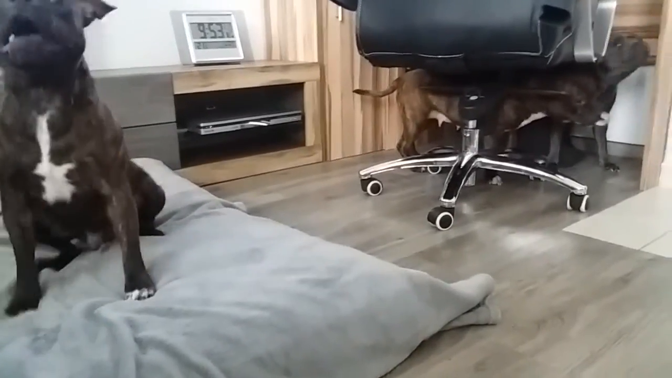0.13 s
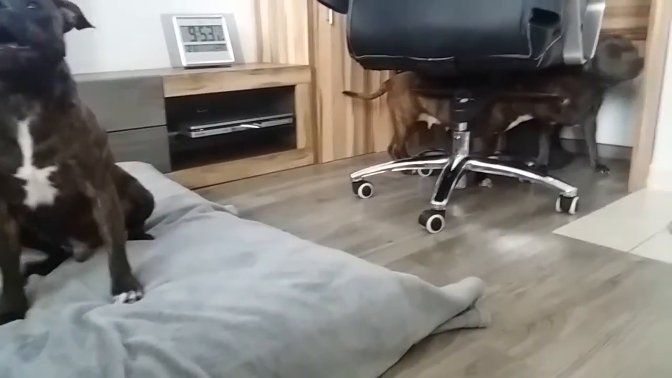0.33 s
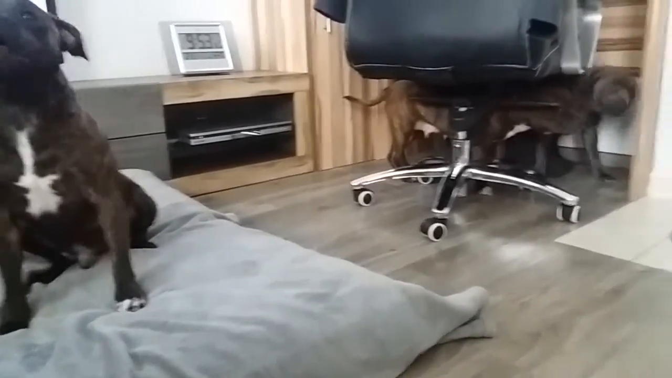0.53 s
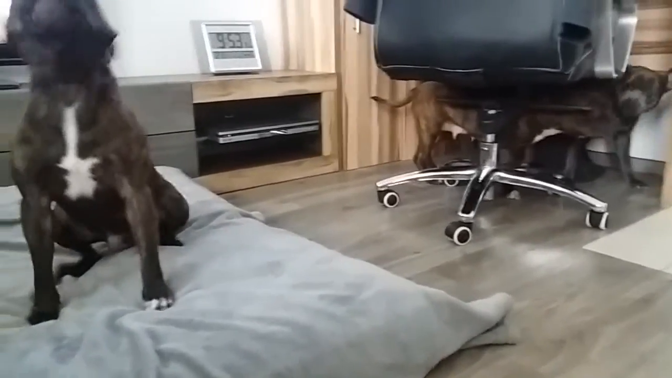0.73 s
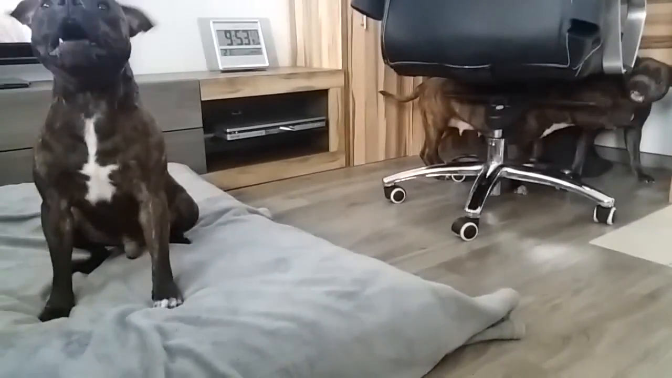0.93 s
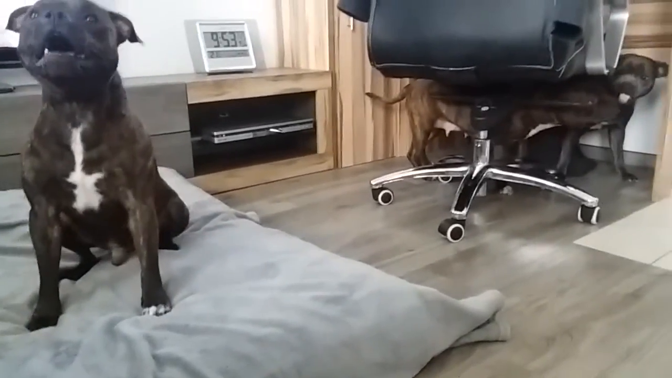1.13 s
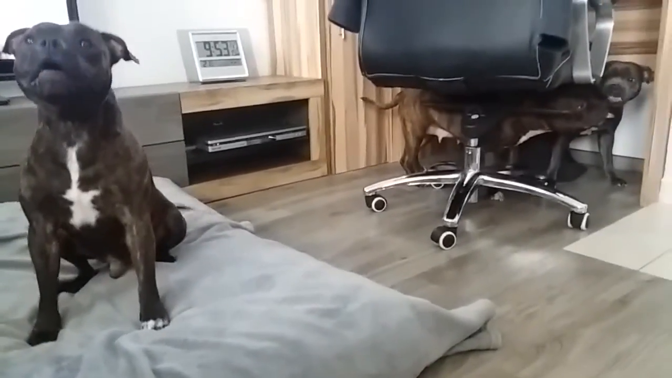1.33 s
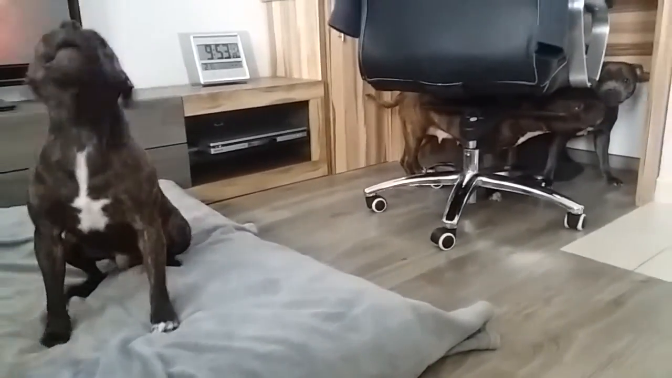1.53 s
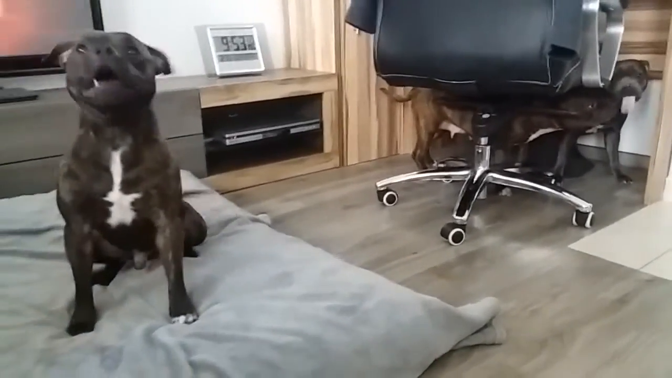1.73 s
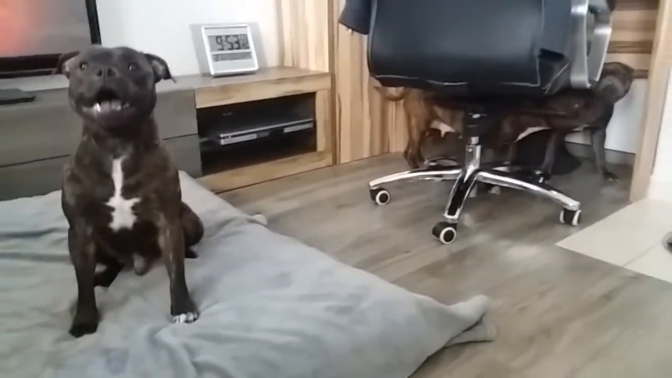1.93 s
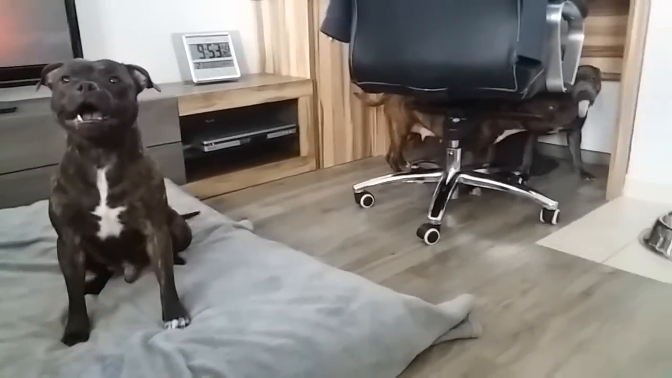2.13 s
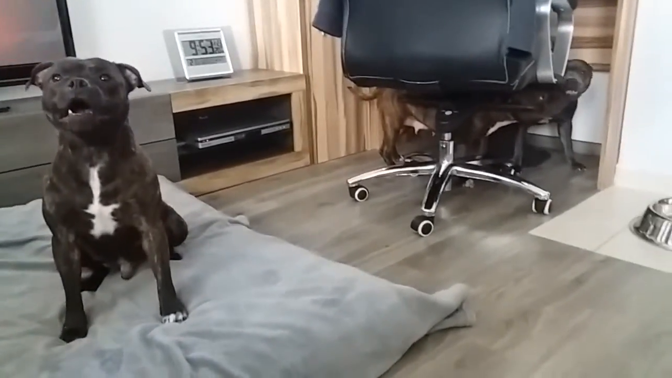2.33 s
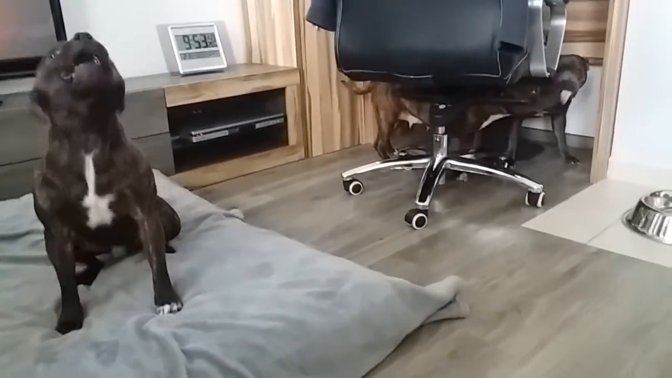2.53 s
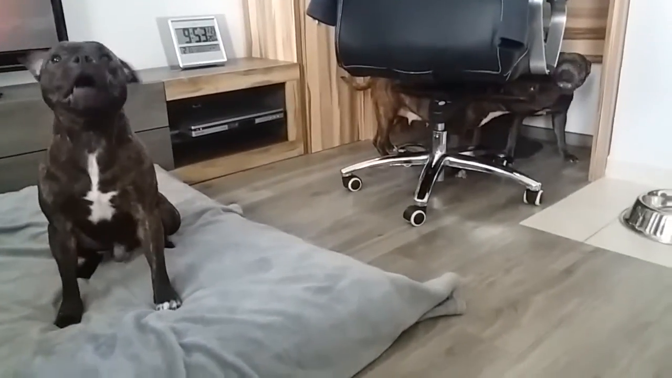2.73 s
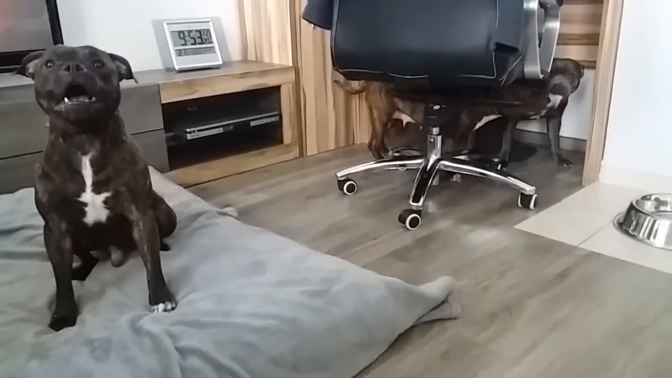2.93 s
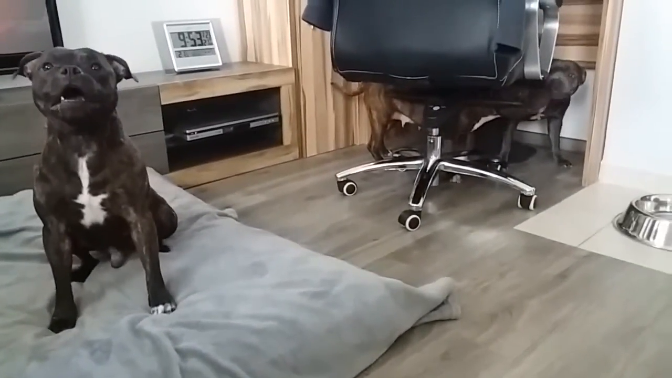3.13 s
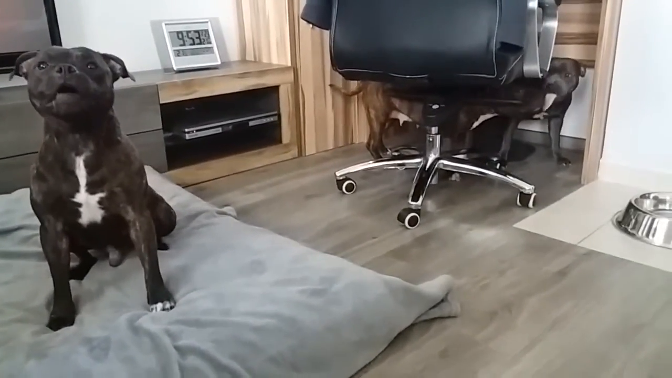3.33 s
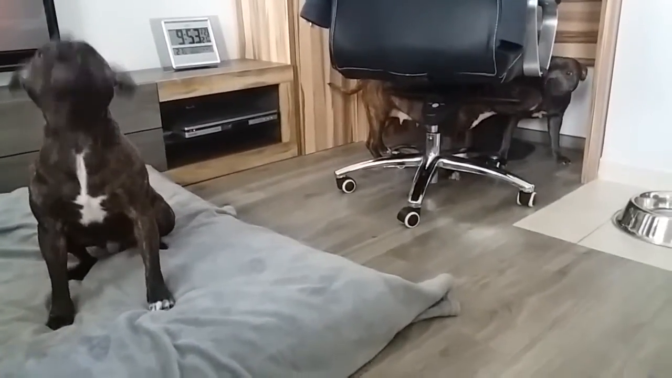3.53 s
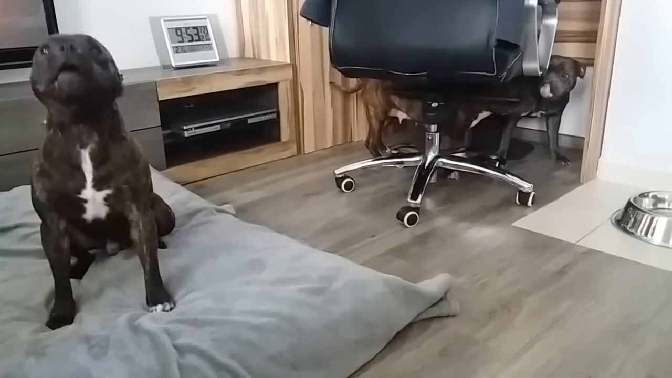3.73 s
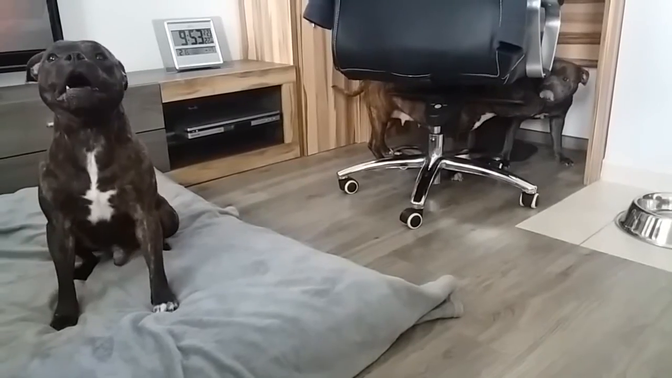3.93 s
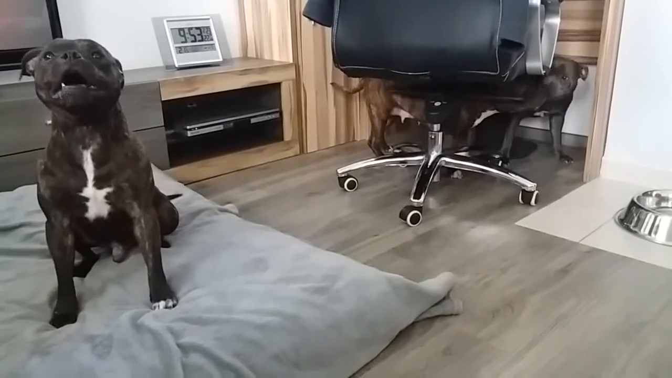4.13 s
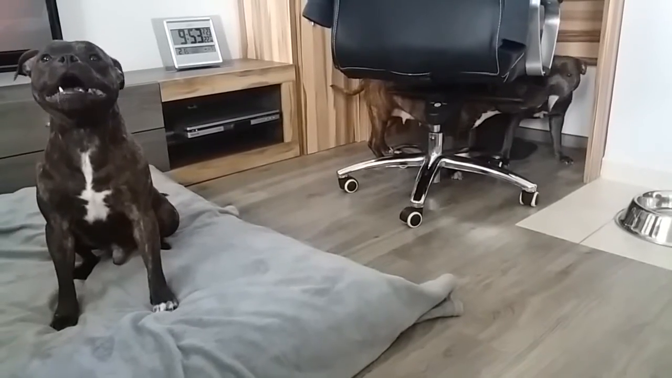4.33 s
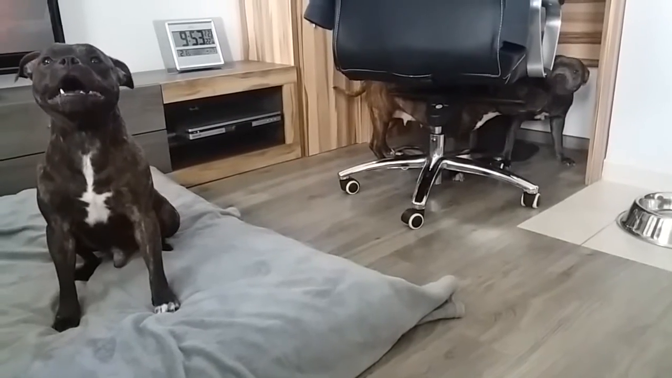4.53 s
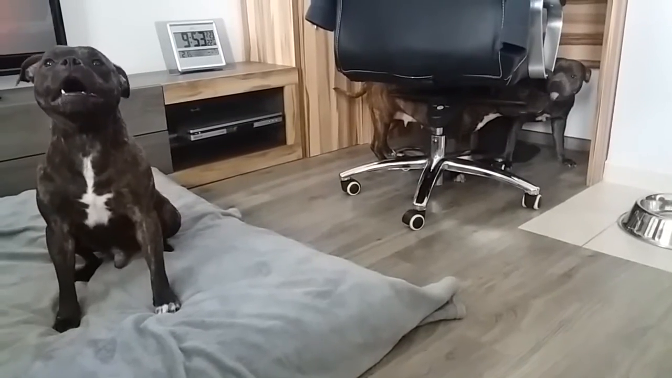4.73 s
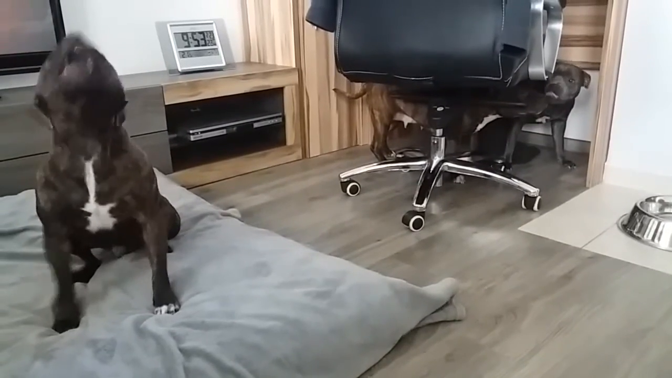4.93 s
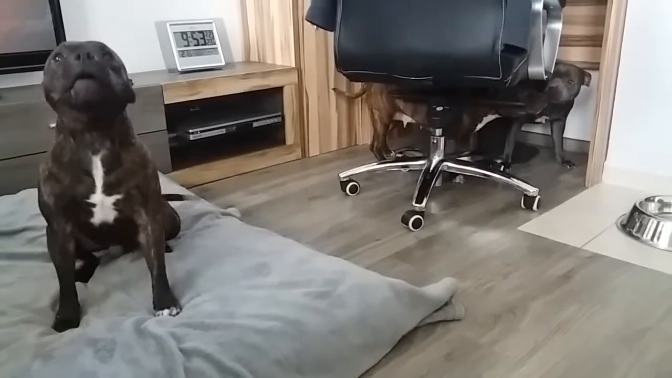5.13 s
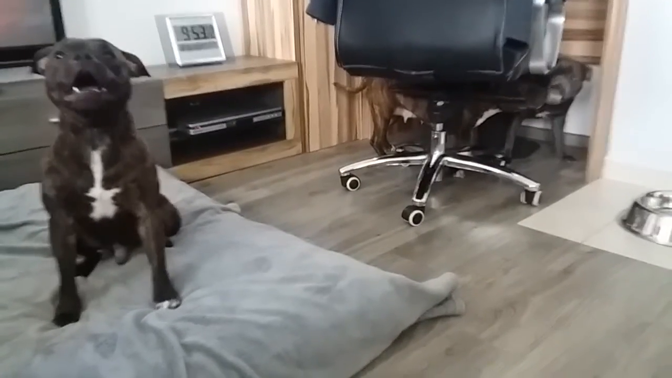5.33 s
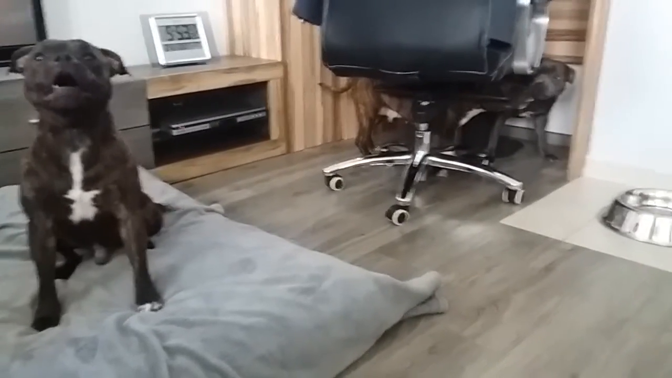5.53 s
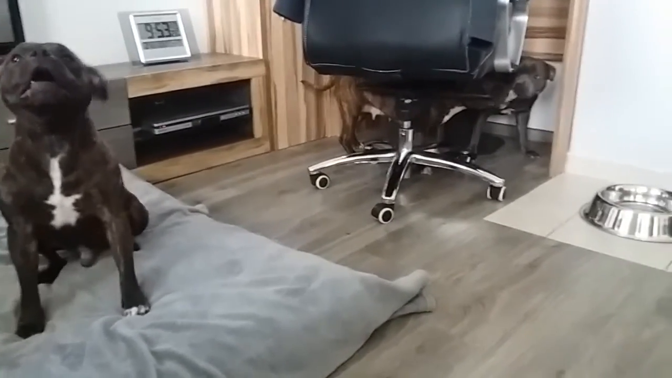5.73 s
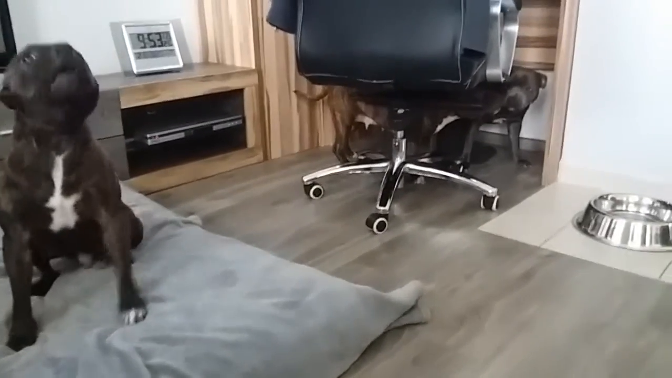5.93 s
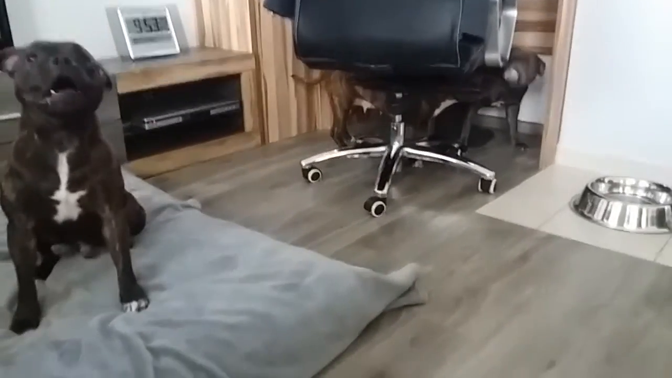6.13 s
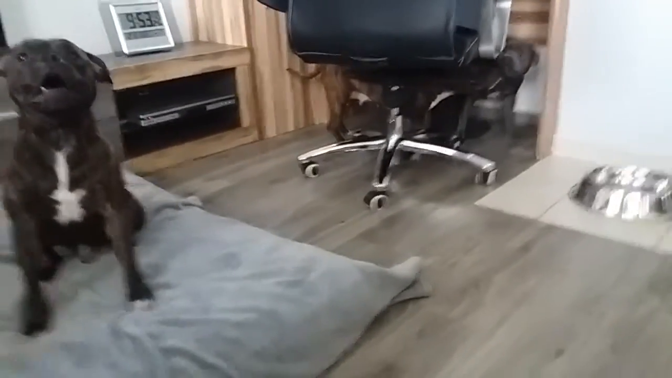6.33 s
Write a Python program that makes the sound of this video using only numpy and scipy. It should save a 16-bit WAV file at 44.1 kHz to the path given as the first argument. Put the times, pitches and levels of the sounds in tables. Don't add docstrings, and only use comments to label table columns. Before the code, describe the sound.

Indoors, over a soft household hum, a dog is already barking as the sound opens. Five gruff, separate barks, a longer gap with quiet breaths, a sharp claw knock between the last two barks, the final one loudest, then a short airy snort through the nose. The room rings after each bark; phone microphone at close to medium distance, with slight handling bumps and rustle of bedding.

```python
import sys
import numpy as np
from scipy import signal
from scipy.io import wavfile
from scipy.ndimage import uniform_filter1d

SR = 44100
rng = np.random.default_rng(int(sys.argv[2]) if len(sys.argv) > 2 else 0)


def voltage_ratio(level):
    return 10 ** (np.asarray(level, float) / 20)


def wav_out(sig):
    wavfile.write(sys.argv[1], SR, np.round(np.clip(np.atleast_2d(sig).T, -1, 1) * 32767).astype(np.int16))


N = 281308
LEAD = SR // 4

# f/Hz, width/Hz, level/dB
THROAT = [(618, 204, 13), (786, 370, -3), (503, 40, -27.5)]
# f/Hz, width/Hz, level/dB
MOUTH = [(1082, 233, 5), (1313, 342, -3), (1483, 336, -2), (1904, 336, -15)]
# f/Hz, width/Hz, level/dB
RASP = [(4690, 456, 9.5), (4380, 370, -2.5), (5200, 340, -15)]
# f/Hz, width/Hz, level/dB
NOSE = [(6220, 900, -1.5), (7650, 700, -2.5), (8600, 1000, -7.5), (11300, 1900, -24.5),
        (13500, 2500, -30.5), (3200, 620, 1.5), (2415, 320, 3)]


def bark(timing, voice_settings, rasp_settings):
    start, rise, hold, peak_db, first_db = timing
    top_hz, mouth_db, nose_db, closing_db, fall_db = voice_settings
    rasp_db, rush_db, fade_db, first_hz, settled_hz = rasp_settings
    t = np.arange(0, .3, 1 / SR)

    sag_db, voiced_fall_s = -3.5, 0.083
    held = t - rise
    falling = held - hold
    under_db = first_db * (1 - t / rise).clip(0) + sag_db * (held / hold).clip(0, 1)
    under_db = under_db + fall_db * falling.clip(0, voiced_fall_s)
    slack = (-under_db / 11.0).clip(0, 1)

    throat_hz = top_hz * (1 - .12 * slack * np.where(t < rise, 1, .4))
    opening = throat_hz / THROAT[0][0]
    shut_db = -13.5 * np.exp(-t / 0.0077)
    mouth_db = mouth_db + 6.0 * slack + shut_db
    nose_db = nose_db + np.where(t < rise, 10.5, closing_db) * slack

    rush_s, glide_s, settle_s, overshoot_hz = 0.027, .033, 0.07, 250
    rush = (t / rush_s) * np.exp(1 - t / rush_s)
    rasp_db = rasp_db + rush_db * rush + fade_db * t + shut_db
    glide_hz = settled_hz + overshoot_hz * (first_hz < settled_hz)
    rasp_hz = np.interp(t, [0, glide_s, settle_s], [first_hz, glide_hz, settled_hz])

    wobble, strength, air = rng.standard_normal((3, SR // 3))[:, :len(t)]
    slaps_per_s = 103 * (1 + .25 * evened(uniform_filter1d(wobble, 400))).clip(.3, 3)
    turns = np.cumsum(slaps_per_s) / SR
    slaps = np.diff(np.floor(turns), prepend=0) * voltage_ratio(1.5 * strength)
    puffs = np.exp(-(turns % 1) / 0.38)
    rough = .35 + (.7 - .35) * slack
    drive = (1 - rough) * evened(slaps) + rough * evened((0.09 + puffs) * air)

    voice = tract(drive, THROAT, opening, wander=0.027)
    voice = voice + voltage_ratio(mouth_db) * tract(drive, MOUTH, opening ** 0.83, flicker_db=3.5, wander=0.042)

    stream = (.6 + puffs) * air
    teeth = tract(stream, RASP, rasp_hz / RASP[0][0], flicker_db=3.0, wander=.012)
    nose_slide = .96 - .1 * np.exp(-t / .025)
    nose = tract(stream, NOSE, nose_slide, flicker_db=5.5, wander=0.031)
    sparkle = tract(stream, NOSE[3:5], opening ** .5, flicker_db=5.0, wander=.03)
    sparkle_db = nose_db + 6.5 * (1 - slack) - 26
    rasp = voltage_ratio(rasp_db) * teeth + voltage_ratio(nose_db) * nose + voltage_ratio(sparkle_db) * sparkle

    edges = t.clip(0, .006) / 0.0045 * np.exp(-(falling - voiced_fall_s).clip(0) / 0.035)
    return start, voltage_ratio(peak_db + under_db) * (voice + rasp) * edges


def grunt(s, db, hz):
    t = np.arange(6000) / SR
    cycles = np.sin(2 * np.pi * hz * t)
    cycles += 0.44 * np.sin(4 * np.pi * hz * t) + 0.25 * np.sin(6 * np.pi * hz * t)
    cycles *= (t / 0.019) * np.exp(1 - t / 0.0089)
    chest_hz, chest_width_hz, chest_db, chest_s = 358, 200, -9.0, .025
    chest = voltage_ratio(chest_db) * evened(resonate(rng.standard_normal(len(t)), chest_hz, chest_width_hz))
    chest *= (t / chest_s) * np.exp(1 - t / chest_s)
    return s, voltage_ratio(db) * (cycles + chest)


def gulp(s, length, db, bright_db):
    air = rng.standard_normal(SR // 4)[:round(length * SR)]
    low = tract(air, THROAT + MOUTH, 1.31)
    high = tract(air, RASP + NOSE[:1] + NOSE[-2:], .94, flicker_db=2.0)
    return s, voltage_ratio(db) * np.hanning(len(air)) * soften(low + voltage_ratio(bright_db) * high, 7500)


def snort():
    # f/Hz, level/dB per Hz
    blast_colour = [(30, -15), (120, 6.5), (220, -10.5), (400, -8.5), (700, -4), (1500, -18), (3000, -5.5),
                    (6000, -11.5), (9000, -18), (12000, -44.5)]
    # f/Hz, level/dB per Hz
    fizz_colour = [(5000, -37), (8000, 2.5), (11000, 0), (14000, -7), (15700, -3)]
    # f/Hz, width/Hz, level/dB
    nostrils = [(2900, 100, -9.5), (3130, 100, -11), (2199, 42, -16), (1470, 42, -16), (4450, 60, -19.5),
                (3750, 95, -28), (3260, 68, -17), (300, 280, -9.5)]
    # f/Hz, width/Hz, level/dB
    first_nostrils = [(4280, 300, -38), (5700, 350, -35), (2200, 280, -36)]
    snort_s, snort_db, attack_s, hold_s = 6.135, -31, .009, .05
    t = np.arange(N - round(snort_s * SR)) / SR
    after = (t - attack_s - hold_s).clip(0)
    blast_db = snort_db - 2.5 * (1 - t / hold_s).clip(0) - 240 * after
    blast = (t / attack_s).clip(0, 1) * voltage_ratio(blast_db)
    air = hiss(blast_colour, len(t), patchy_db=1.5)
    fizz = voltage_ratio(-13 - 100 * after) * hiss(fizz_colour, len(t), patchy_db=1.5)

    nose = np.zeros(len(t))
    for hz, width, db in nostrils:
        nose += voltage_ratio(db) * evened(resonate(air, hz * (1 + .012 * np.sin(hz + 40 * t)), width))
    nose *= (t > .022) * voltage_ratio(15 * t / 0.14)

    start = sum(voltage_ratio(db) * evened(resonate(air, hz, width)) for hz, width, db in first_nostrils)
    start = start * np.exp(-((t - .012) / 0.0067) ** 2)
    flutter = voltage_ratio(2.2 * evened(uniform_filter1d(rng.standard_normal(len(t)), 150)))
    return snort_s, blast * (air + nose + fizz) * flutter + start


def claw(s, tick_db, tick_hz, knock_db):
    edge = np.zeros(3000)
    edge[4:7] = voltage_ratio(tick_db - 18.5) * np.array([1, -2, 1])
    return s, edge + struck(knock_db - 13.0, 1000, 900) + struck(tick_db + 10.0, tick_hz, 1300)


def paw(s, thud_db, thud_hz):
    return s, struck(thud_db + 5.0, thud_hz, 130)


def struck(db, hz, width):
    blow = np.zeros(3000)
    blow[:9] = np.hanning(9)
    ring = resonate(blow, hz, width)
    return voltage_ratio(db) * ring / abs(ring).max()


def tag(t):
    # f/Hz, level/dB
    slow_modes = [(2180, -67), (2740, -68), (2850, -72.5), (3120, -69.5), (3400, -65), (3280, -68.5),
                  (3612, -66.5), (4560, -70), (745, -62.5)]
    # f/Hz, level/dB
    early_modes = [(264, -62), (6024, -69.5), (8586, -75), (10277, -84)]
    low = sum(voltage_ratio(db) * evened(resonate(rng.standard_normal(N), hz, 8.1)) for hz, db in slow_modes)
    high = sum(voltage_ratio(db) * np.sin(2 * np.pi * (hz * t + rng.random())) for hz, db in early_modes)
    return low * voltage_ratio(2.5 - 4 * t ** 2) + high * ((.72 - t) / 0.13).clip(0, 1)


def household(t):
    # f/Hz, level/dB per Hz
    hum_colour = [(60, -30.5), (130, -16.5), (250, -5), (400, -17.5), (600, -2), (750, -7), (900, -4),
                  (1200, -10.5), (2000, -16.5), (3400, -19.5), (4500, -19), (6000, -41.5), (9000, -50),
                  (15700, -56)]
    # f/Hz, width/Hz, level/dB
    drone_tone = (100, 25, -70)
    # peak t/s, level/dB, swell/dB per s, fade/dB per s
    shuffles = [
        (0, -41.5, 100, 48),
        (.22, -42, 301, 89),
        (.5, -52, 30, 10.5),
        (2.0, -64, 2.5, 3.5),
        (5.8, -54, 45, 5),
        (6.38, -48, 11, 30),
    ]
    # f/Hz, level/dB per Hz
    shuffle_colour = [(60, -37.5), (200, -1.5), (500, -1.5), (1200, -6.5), (3000, -7.5), (5000, -10.5),
                      (8000, -26), (15000, -53)]
    # peak t/s, level/dB, swell/dB per s, fade/dB per s
    hand_shifts = [
        (0, -50.5, 30, 6.5),
        (1.6, -44, 80, 110),
        (2.2, -63, 6, 12),
        (2.65, -48, 91, 141),
        (3.6, -50.5, 90, 49),
        (4.8, -63.5, 9, 8.0),
        (5.17, -39.5, 149, 146),
        (5.3, -54, 49, 11),
        (5.87, -44, 220, 105),
        (6.38, -47.5, 55, 30),
    ]
    # f/Hz, level/dB per Hz
    grip_colour = [(20, -33.5), (40, -27), (65, 0.5), (110, -7), (170, -6), (300, -25.5), (600, -63)]
    hum = voltage_ratio(-56.5) * hiss(hum_colour, N, patchy_db=2.0)
    drone_hz, drone_width_hz, drone_db = drone_tone
    drone = voltage_ratio(drone_db) * evened(resonate(rng.standard_normal(N), drone_hz, drone_width_hz))
    rustle = stirrings(t, shuffles) * hiss(shuffle_colour, N, patchy_db=1.5)
    grip = stirrings(t, hand_shifts) * hiss(grip_colour, N, patchy_db=3.0)
    return hum + drone + rustle + grip


def stirrings(t, rows):
    power = np.zeros(len(t))
    for s, db, swell_db, fade_db in rows:
        power += voltage_ratio(db - swell_db * (s - t).clip(0) - fade_db * (t - s).clip(0)) ** 2
    return np.sqrt(power)


def room(x):
    # f/Hz, t/s
    ring_times = [(120, 0.42), (330, 0.66), (870, 0.66), (2300, 0.84), (4800, 0.67), (7500, 0.51),
                  (12000, 0.42)]
    # t/s, level/dB
    echoes = [(.0031, -6), (.0074, -13.5), (.0113, -10.5), (.0168, -29.5), (.0225, -3.5)]
    taps = np.zeros(SR)
    at = np.arange(0, SR - 20, 20)
    taps[at + rng.integers(0, 20, len(at))] = rng.choice([-1., 1.], len(at))
    hz, t, z = signal.stft(taps, SR, nperseg=256)
    decay = voltage_ratio(-60 * t / read(ring_times, hz)[:, None])
    tail = signal.istft(z * decay, SR, nperseg=256)[1]
    tail *= (np.arange(len(tail)) / (0.0081 * SR)).clip(0, 1)
    tail /= np.linalg.norm(tail)
    for k, (s, db) in enumerate(echoes):
        tail[round(s * SR)] += (-1) ** k * voltage_ratio(db)
    return signal.fftconvolve(x, tail)[:len(x)]


def tract(x, modes, factor=0.941, flicker_db=0., wander=0.):
    slow = uniform_filter1d(rng.standard_normal((2, len(modes), SR // 3)), 900, axis=2)
    flicker, drift = evened(slow)[..., :len(x)]
    total = np.zeros(len(x))
    for k, (hz, width, db) in enumerate(modes):
        ring = resonate(x, hz * factor * (1 + wander * drift[k]), width)
        total += (-1) ** k * voltage_ratio(db + flicker_db * flicker[k]) * ring
    return evened(total)


def resonate(x, hz, width):
    r = np.exp(-np.pi * width / SR)
    if np.ndim(hz) == 0:
        pole = [1, -r * np.exp(2j * np.pi * hz / SR)]
        return 2 * signal.lfilter([(1 - r) ** 2], np.convolve(pole, pole), x).real
    turn = np.exp(2j * np.pi * np.cumsum(hz) / SR)
    smooth = signal.lfilter([(1 - r) ** 2], [1, -2 * r, r * r], x * turn.conj())
    return 2 * (turn * smooth).real


def hiss(colour, size, patchy_db):
    frames, hz = size // 256 + 5, np.fft.rfftfreq(1024, 1 / SR)
    a, b, patches = rng.standard_normal((frames, 513, 3)).T
    patches = evened(uniform_filter1d(uniform_filter1d(patches, 12, 0), 10, 1))
    z = (a + 1j * b) * voltage_ratio(read(colour, hz)[:, None] + patchy_db * patches)
    return evened(signal.istft(z, nperseg=1024, noverlap=768)[1][:size])


def soften(x, edge_hz):
    return signal.sosfilt(signal.butter(2, edge_hz, fs=SR, output="sos"), x)


def evened(x):
    return x / np.sqrt(np.mean(x ** 2) + 1e-20)


def read(points, hz):
    f, value = np.transpose(points)
    return np.interp(np.log(hz + 1), np.log(f + 1), value)


def add(mix, s, sound):
    part = mix[round(s * SR) + LEAD:][:len(sound)]
    part += sound[:len(part)]


def scene():
    # start t/s, rise t/s, hold t/s, peak level/dB, first sound under the peak/dB
    barks = [
        (-.2, 0.061, 0.079, -15, -21),
        (.625, 0.058, 0.033, -9.5, -12.5),
        (1.492, .058, 0.048, -10.5, -13),
        (2.487, .062, 0.048, -8.5, -12.5),
        (3.535, .035, 0.076, -11.5, -20.5),
        (4.939, 0.04, 0.074, -9.5, -8.5),
        (5.822, .033, 0.068, -8, -11),
    ]
    # throat f/Hz, mouth level/dB, nose level/dB, extra nose in closing/dB, fall/dB per s
    voices = [(641, -3.5, -26.5, 7.5, -150), (668, -6.5, -27, 5.5, -200), (585, -9.5, -33, 16, -420),
              (627, -10, -27, 3.5, -160), (640, -7.5, -26, 2, -120), (697, -7, -27, 10, -150),
              (653, -6.5, -31, 2, -180)]
    # level/dB, extra in first rush/dB, fade/dB per s, first f/Hz, settled f/Hz
    rasps = [(-13, 6.5, -59, 4700, 4800), (-17, 1, -21, 5270, 4820), (-30, 7, 0.1, 5500, 4600),
             (-17, 10, -62, 4370, 4740), (-13, 8.5, -49, 4360, 4720), (-17, 8, -40, 4300, 4740),
             (-19, 10.5, -93, 4210, 4730)]
    # t/s, level/dB, f/Hz
    grunts = [
        (0.624, -30, 239),
        (1.468, -34, 145.5),
        (2.482, -27, 149),
        (3.498, -44, 91),
        (3.528, -32.5, 201),
        (4.942, -28, 202),
        (5.812, -27.5, 170),
        (5.851, -29.5, 110),
    ]
    # t/s, length t/s, level/dB, brightness/dB
    gulps = [(.5, 0.12, -54, -21), (1.423, 0.03, -50.5, -21), (1.462, 0.052, -41.5, -21.5),
             (2.402, 0.069, -48.5, 2.5), (2.459, 0.033, -48, -3), (3.06, 0.088, -68.5, 10.5),
             (3.457, 0.25, -51, -11), (4.076, 0.1, -47, -6.5), (4.74, 0.12, -56, 4),
             (5.656, 0.12, -56.5, -1.5), (5.757, 0.039, -46.5, -26)]
    # t/s, tick level/dB, tick f/Hz, knock level/dB
    claws = [(.216, -54.5, 2600, -29), (0.508, -43, 2090, -40), (1.138, -33.5, 4770, -27),
             (1.139, -38.5, 3120, -42.5), (1.161, -55, 2870, -40), (1.3, -63, 5190, -46),
             (1.757, -50, 5500, -50), (2.12, -59.5, 4200, -54), (2.93, -58, 5500, -41.5),
             (3.188, -55.5, 5170, -53), (4.137, -47.5, 3490, -39.5), (5.315, -51, 6000, -52),
             (5.346, -23, 2900, 1), (5.3461, -35.5, 5970, -7), (5.365, -38, 4500, -34),
             (5.509, -38.5, 4870, -32), (5.608, -42.5, 4830, -18.5), (5.619, -43.5, 4230, -44),
             (5.779, -47, 4000, -48), (6.11, -50, 5800, -45)]
    # t/s, thud level/dB, f/Hz
    paws = [(.216, -27.5, 255), (0.29, -41, 188), (0.372, -41, 197), (0.519, -49, 110), (1.138, -46, 266),
            (1.757, -54.5, 198), (4.137, -40.5, 199), (5.315, -56.5, 130), (5.346, -26.5, 129),
            (5.3462, -31.5, 340), (5.365, -49, 100), (5.509, -47.5, 253), (5.608, -47, 250),
            (5.619, -41.5, 115), (5.709, -41.5, 200), (5.779, -49, 250), (6.11, -50, 223)]
    dog, near = np.zeros((2, N + LEAD))
    for timing, voice, rasp in zip(barks, voices, rasps):
        add(dog, *bark(timing, voice, rasp))
    for source, rows in [(grunt, grunts), (gulp, gulps), (claw, claws), (paw, paws)]:
        for row in rows:
            add(near, *source(*row))
    add(near, *snort())
    no_bass = signal.butter(4, 420, "highpass", fs=SR, output="sos")
    dog = soften(voltage_ratio(-7.5) * signal.sosfilt(no_bass, dog), 9500)
    wet = dog + near + room(dog + voltage_ratio(-19.0) * near)
    t = np.arange(N) / SR
    return (wet[LEAD:] + tag(t) + household(t))[None]


def band_limit(x):
    return signal.sosfilt(signal.butter(12, 15710, fs=SR, output="sos"), x)


def record(dry):
    # f/Hz, level/dB per Hz
    self_noise = [(20, -2.5), (45, -6), (200, -26.5), (5000, -43), (15700, -41.5)]
    band = [32, 15700]
    fade_in = (np.arange(N) / 120).clip(0, 1)
    sensed = dry + voltage_ratio(-75.5) * hiss(self_noise, N, patchy_db=-1.0)
    limited = 1.324 * np.tanh(sensed * fade_in / 1.407)
    limited = signal.sosfilt(signal.butter(2, band[0], "highpass", fs=SR, output="sos"), limited)
    treble_limit = signal.firwin(1023, band[1], window=("kaiser", 9), fs=SR)
    limited = signal.oaconvolve(limited, treble_limit[None], "same")
    return band_limit(limited)


dry = scene()
out = record(dry)
wav_out(out)
```